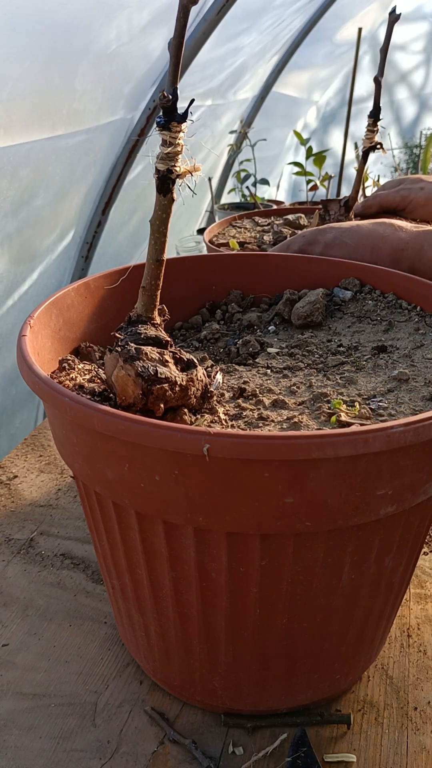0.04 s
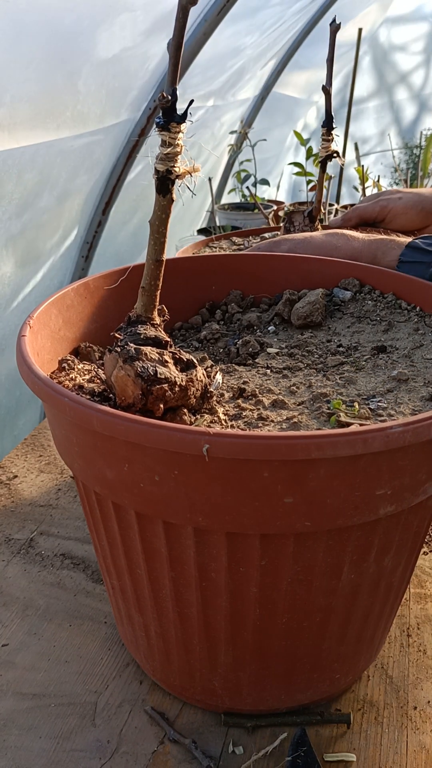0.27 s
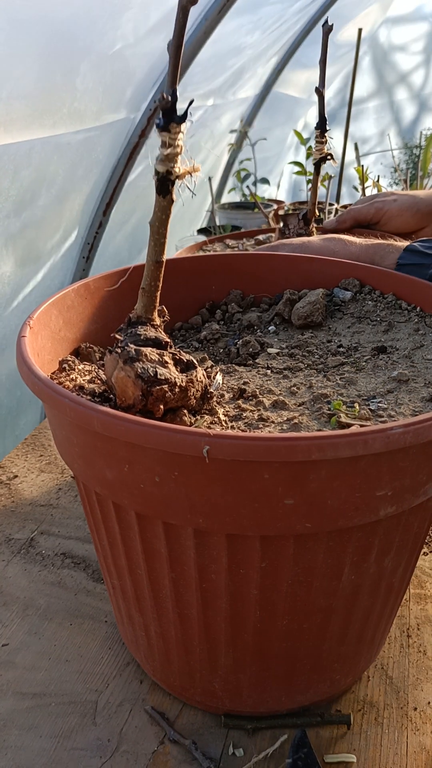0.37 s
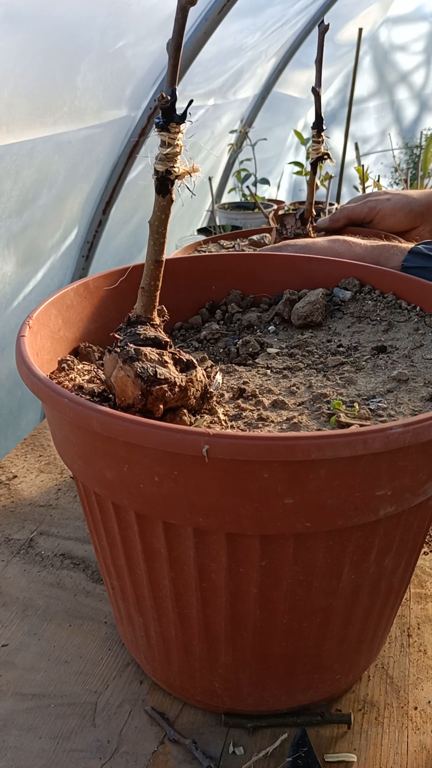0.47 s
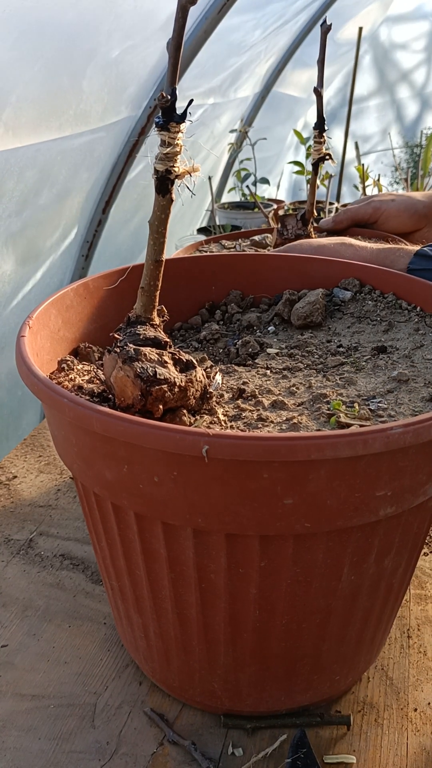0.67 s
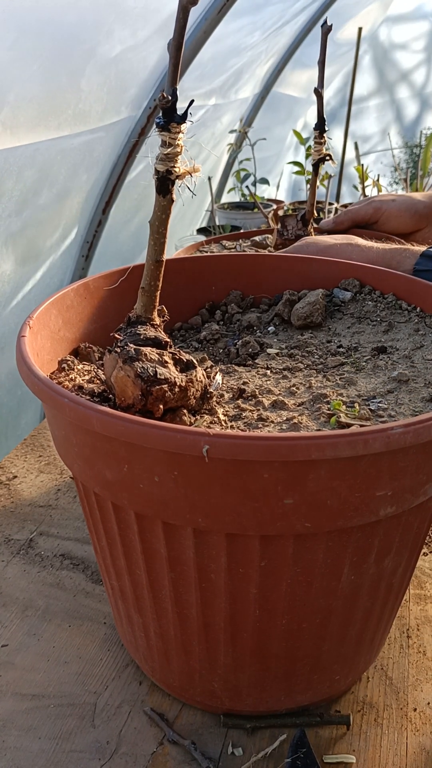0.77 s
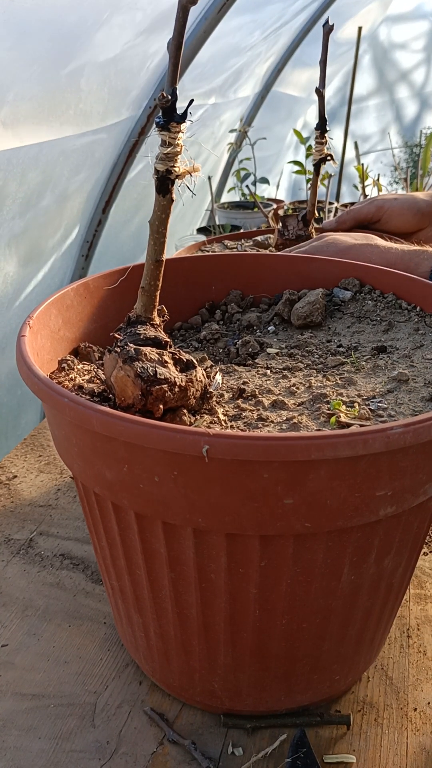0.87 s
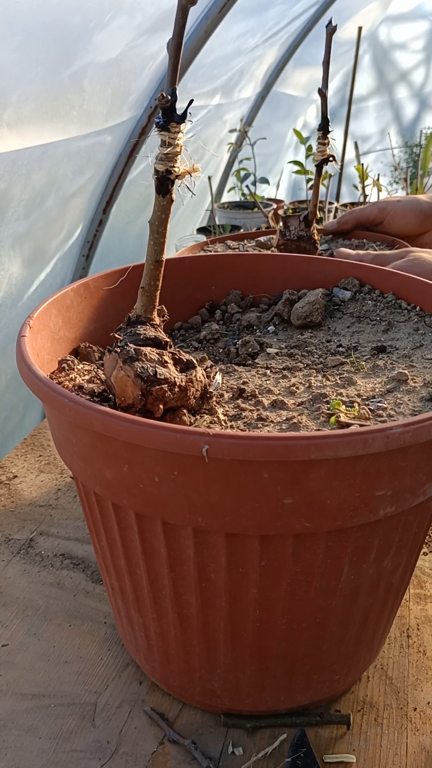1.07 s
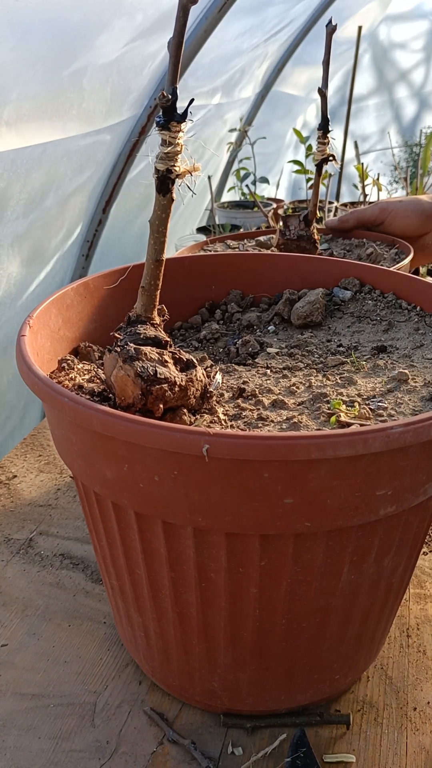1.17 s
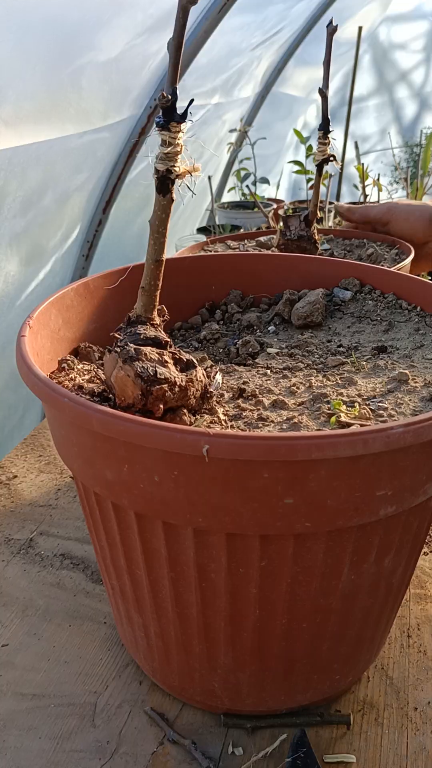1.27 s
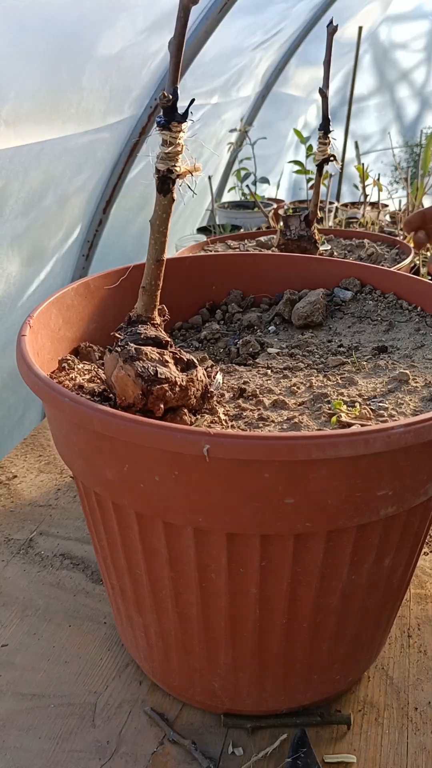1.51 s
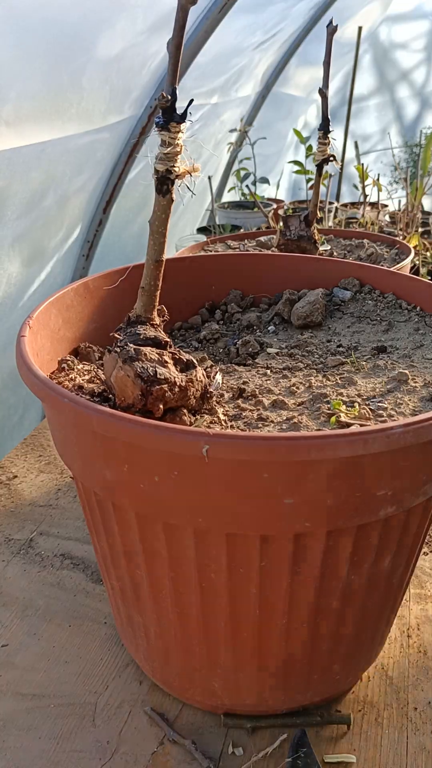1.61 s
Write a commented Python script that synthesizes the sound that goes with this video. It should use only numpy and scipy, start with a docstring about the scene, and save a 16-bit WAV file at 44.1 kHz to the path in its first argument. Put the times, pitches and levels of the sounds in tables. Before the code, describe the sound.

A plastic plant pot scrapes and knocks on a gritty wooden bench, then cloth swishes.

```python
"""Plant pot on a greenhouse bench

A soil-filled plastic pot scuffs over grit, knocks down and drags to rest while the wooden bench thuds
and rumbles under it. A hand rubs the rim, then a sleeve swishes past as the arms draw back. All this
sits on the left; the muffled right microphone gets low buffeting and a few bumps. Quiet air fills both."""
import sys
import numpy as np
from scipy import signal
from scipy.fft import rfft, irfft
from scipy.io import wavfile
from scipy.ndimage import uniform_filter1d

SR = 44100
rng = np.random.default_rng(int(sys.argv[2]) if len(sys.argv) > 2 else 0)


def wav_record(signal):
    """Record a signal, one row per channel, as 16-bit PCM in the file named by sys.argv[1]."""
    frames = np.transpose(np.atleast_2d(signal))
    bounded = np.clip(frames, -1, 1)
    # unit amplitude maps onto the largest positive 16-bit level
    quanta = np.round(bounded * 32767).astype(np.int16)
    wavfile.write(sys.argv[1], SR, quanta)


N = 72765
T = np.arange(N) / SR
HZ = np.fft.rfftfreq(N, 1 / SR)

# Tone of the outdoor air on each side: f/Hz, level/dB
AIR_LEFT_EQ = [(20, 2.5), (60, -6), (120, -4.5), (200, -11), (450, -14.5), (680, -20.5), (860, -16.5),
               (1100, -27), (1600, -25.5), (2150, -27.5), (3000, -30.5), (5000, -37.5), (7400, -44.5),
               (9200, -51), (15500, -46)]
AIR_RIGHT_EQ = [(20, 1.5), (100, -0.5), (160, -6), (400, -9), (1000, -17.5), (3500, -20), (6000, -28.5),
                (9000, -29), (15500, -28)]
# Fader ride on the right-hand air: t/s, level/dB
HISS_RIDE = [(0, -7), (.16, -5.5), (.23, 2), (.62, 1.5), (.78, -1), (.85, -4), (.92, -1), (1.65, -0.5)]
# Air buffeting the right microphone: t/s, sway level/dB, flutter level/dB
BUFFET_RIDE = [(0, -58, -75), (.15, -60.5, -57.5), (.25, -29.5, -46), (.35, -41.5, -56), (.395, -29.5, -36),
               (.45, -18, -18.5), (.51, -21, -38), (.6, -24, -39), (.68, -34.5, -46), (.77, -40, -47.5),
               (.86, -46, -73), (.93, -43, -62), (1.06, -41.5, -54), (1.28, -44.5, -69), (1.38, -52, -92),
               (1.65, -56, -65)]
# Tone of its deep sway and its flutter: f/Hz, level/dB
SWAY_EQ = [(5, -6.5), (14, 11), (28, 11.5), (45, -3.5), (80, -46), (200, -78)]
FLUTTER_EQ = [(20, 0), (60, 4), (90, 7.5), (115, 2.5), (160, -17), (400, -24.5), (800, -42.5), (1400, -53),
              (5000, -85)]
# Bumps on the right microphone and thuds of the bench: t/s, relative level/dB, high cut/Hz
MIC_BUMPS = [(.258, -39.5, 420), (.328, -48, 704), (.431, -30.5, 580), (.448, -11, 116), (.578, -35, 217),
             (.768, -58, 275)]
BENCH_THUDS = [(.266, -33.5, 340), (.497, -29.5, 223), (.565, -39.5, 350), (.699, -37, 200),
               (1.123, -38, 185), (1.324, -42, 334), (1.574, -33.5, 191)]
# Stroke of the sleeve: t/s, rub level/dB, fizz level/dB
SLEEVE_RIDE = [(1.0, -59.5, -83), (1.13, -51, -60), (1.22, -45.5, -57), (1.33, -41.5, -45),
               (1.41, -38.5, -44), (1.5, -37, -52), (1.545, -37, -73), (1.58, -45, -50), (1.65, -45.5, -60)]
# Tone of the cloth's rub and its treble fizz: f/Hz, level/dB
SLEEVE_EQ = [(500, 4.5), (850, -4), (1150, 4), (1350, 4.5), (1500, -2.5), (1800, 1.5), (2700, 0),
             (3500, 3.5), (4700, 1), (6200, 0.5), (7100, 6.5), (8100, 4), (9000, -3), (10500, -10),
             (15500, -14)]
FIZZ_EQ = [(600, -24), (1150, 7.5), (3000, 2.5), (6000, -11), (8000, 4), (9500, 1.5), (11500, -1),
           (15500, -6)]
# Swells of the hand on the rim, the base on grit and the rumbling bench: t/s, level/dB
RIM_RIDE = [(.84, -75), (.92, -58), (.965, -53), (.995, -48), (1.025, -56.5), (1.08, -85)]
GRIT_RIDE = [(0, -44.5), (.14, -51.5), (.2, -45), (.28, -47.5), (.32, -55.5), (.385, -49), (.405, -42),
             (.5, -43), (.56, -50), (.7, -53), (.8, -55.5), (.86, -64), (.94, -51), (1, -52), (1.05, -57.5),
             (1.15, -56.5), (1.65, -50)]
RUMBLE_RIDE = [(0, -46), (.15, -53), (.2, -49.5), (.27, -37), (.32, -70), (.38, -60), (.41, -30.5),
               (.5, -42.5), (.6, -35), (.68, -49), (.85, -43), (1, -69), (1.65, -55)]
# Tone of the same three: f/Hz, level/dB
RIM_EQ = [(900, -23), (1850, -13), (2230, -0.5), (2600, -10.5), (3600, -12), (4800, -22), (7400, -19),
          (9500, -25), (15000, -36)]
GRIT_EQ = [(200, 10.5), (700, 4), (1200, 1.5), (1500, -1.5), (1800, -1.5), (2400, 0), (3600, 0), (4800, -5),
           (6200, -5.5), (7300, -3), (8200, -6), (9200, -10.5), (11000, -17.5), (15500, -23)]
RUMBLE_EQ = [(20, 11.5), (70, 10), (130, -2.5), (250, -5.5), (420, -6), (600, -11.5), (900, -17),
             (1500, -66), (4000, -65)]
# Modes of the soil-filled pot: f/Hz, relative level/dB, T60/s
POT_MODES = [(274, -8, 0.05), (420, -6, 0.023), (770, -23, 0.017), (936, -9.5, 0.051), (1226, -13.5, 0.075),
             (1743, -15, 0.023), (2044, -7.5, 0.019), (2620, -22, 0.023), (3068, -17, 0.032),
             (3950, -13.5, 0.024), (5840, -8.5, 0.018), (7375, -8, 0.017)]
# Knocks and taps of the pot: t/s, relative level/dB, high cut/Hz, low cut/Hz, relative snap level/dB
POT_KNOCKS = [(0.1527, -21, 3320, 2970, -60), (0.1852, -29, 4960, 500, -53), (.252, -32.5, 6000, 895, -52),
              (.3888, -15, 10100, 180, -28.5), (0.3934, -22, 3220, 350, -41), (.432, -22, 1310, 500, -60),
              (0.6146, -25, 2700, 1400, -38), (1.361, -17.5, 1400, 1410, -68),
              (1.508, -24.5, 1930, 1210, -61), (1.564, -14, 1350, 1420, -52), (1.599, -24, 5500, 1110, -43)]

GRAINY_SLIPS = dict(per_s=2500, spread_db=3, share=0.53)
FIBRE_SLIPS = dict(per_s=7000, spread_db=1.5, share=0.34)


def amp(db):
    """Decibels to gain."""
    return 10 ** (np.asarray(db) / 20)


def unit(x):
    """Scales to rms 1."""
    return x / np.sqrt(np.mean(x ** 2) + 1e-20)


def ride(points, column=1):
    """A fader move: gain over time from one dB column."""
    columns = np.transpose(points)
    return amp(np.interp(T, columns[0], columns[column]))


def colour(x, eq):
    """Shapes a sound with an EQ curve, at rms 1."""
    hz, db = np.transpose(eq)
    gain = amp(np.interp(np.log(HZ + 1), np.log(hz + 1), db)) * (HZ > 0)
    return unit(irfft(rfft(x) * gain, N))


def band(x, hz, kind, order=2):
    """Low-pass or high-pass."""
    return signal.sosfilt(signal.butter(order, hz, kind, fs=SR, output="sos"), x)


def add(mix, start_s, sound):
    """Drops a sound into the mix on its cue."""
    part = mix[round(start_s * SR):][:len(sound)]
    part += sound[:len(part)]


def noise(eq):
    """A bed of coloured noise."""
    return colour(rng.standard_normal(N), eq)


def steady(x):
    """Evens out the chance swells of a low noise."""
    power = uniform_filter1d(abs(signal.hilbert(x)) ** 2, size=1500)
    return unit(x / np.sqrt(power + 1e-9))


def friction(per_s, spread_db, share, patch_db=1.63):
    """Tiny uneven slips carry a share of the power over a smooth rub; the tone drifts in patches."""
    slips = (rng.random(N) < per_s / SR) * rng.choice([-1, 1], N)
    sizes = amp(spread_db * np.minimum(rng.exponential(1, N), 4))
    rub = np.sqrt(share) * unit(slips * sizes) + np.sqrt(1 - share) * rng.standard_normal(N)
    spectra = signal.stft(rub, nperseg=256)[2]
    patches = uniform_filter1d(rng.standard_normal(spectra.shape), size=5, axis=0)
    patches = unit(uniform_filter1d(patches, size=12, axis=1))
    return signal.istft(spectra * amp(patch_db * patches))[1][:N]


def air(eq, db):
    """Outdoor air lays a quiet bed of hiss."""
    return amp(db) * noise(eq)


def greenhouse(x, tail_db=-13, t60=0.28, echo_db=-14):
    """Adds eight early reflections from bench and pots, and a short soft tail."""
    t = T[:SR // 3]
    tail = rng.standard_normal(len(t)) * amp(-60 * t / t60)
    echoes = np.zeros(len(t))
    for delay_s, sign in zip(rng.uniform(0.0009, 0.0099, 8), rng.choice([-1, 1], size=8)):
        add(echoes, delay_s, np.array([sign]))
    room = amp(tail_db) * tail / np.linalg.norm(tail) + amp(echo_db) * echoes / np.linalg.norm(echoes)
    return (x + signal.fftconvolve(x, room)[:N]) / np.sqrt(1 + np.sum(room ** 2))


def buffet():
    """Moving air sways and flutters at the right microphone."""
    sway = ride(BUFFET_RIDE) * steady(noise(SWAY_EQ))
    flutter = ride(BUFFET_RIDE, column=2) * steady(noise(FLUTTER_EQ))
    return sway + flutter


def thuds(cues, t60, rise_s=0.0034):
    """Soft pushes on bench or microphone: dull, pitchless and quick to die."""
    out, t = np.zeros(N), T[:SR // 5]
    for start_s, db, top_hz in cues:
        lows = band(rng.standard_normal(len(t)), top_hz, "low", order=4)
        body = steady(band(lows, top_hz / 2, "high"))
        envelope = 2 * amp(db - 60 * t / t60) * np.minimum(t / rise_s, 1)
        add(out, start_s, band(envelope * body, top_hz, "low"))
    return out


def sleeve(low_cut_hz=690):
    """Cloth slides over the rim: dense fibre slips that fizz most in mid-stroke."""
    rub = colour(friction(**FIBRE_SLIPS), SLEEVE_EQ)
    rub = unit(band(rub, low_cut_hz, "high"))
    fizz = colour(friction(**FIBRE_SLIPS), FIZZ_EQ)
    return ride(SLEEVE_RIDE) * rub + ride(SLEEVE_RIDE, column=2) * fizz


def rim_rub():
    """A hand slips along the hollow rim."""
    return ride(RIM_RIDE) * colour(friction(**GRAINY_SLIPS), RIM_EQ)


def squeak(start_s=0.525, length_s=0.13, from_hz=6300, to_hz=6000, width_hz=210, db=-60):
    """Rubbed plastic sings faintly in one narrow, falling resonance."""
    progress = np.clip((T - start_s) / length_s, 0, 1)
    pitch_hz = from_hz + (to_hz - from_hz) * progress
    carrier = np.exp(2j * np.pi * np.cumsum(pitch_hz) / SR)
    fuzz = band(rng.standard_normal(N) + 1j * rng.standard_normal(N), width_hz / 2, "low")
    return amp(db) * np.sin(np.pi * progress) * unit((fuzz * carrier).real)


def scrape():
    """Grit slips under the pot's base, and the bench rumbles with it."""
    grit = colour(friction(**GRAINY_SLIPS), GRIT_EQ)
    rumble = steady(noise(RUMBLE_EQ))
    return ride(GRIT_RIDE) * grit + ride(RUMBLE_RIDE) * rumble


def knocks(rise_s=0.00018, crack_db=-2.52, crack_t60=0.02, snap_t60=0.0082, snap_low_cut_hz=3530):
    """Each blow gives a bright snap, a gritty crack and a brief ring of the damped pot."""
    out, t = np.zeros(N), T[:SR // 5]
    attack = np.minimum(t / rise_s, 1)
    ring = sum(amp(db - 60 * t / t60) * (-1) ** k * np.sin(2 * np.pi * hz * t)
               for k, (hz, db, t60) in enumerate(POT_MODES))
    for start_s, db, high_cut_hz, low_cut_hz, snap_db in POT_KNOCKS:
        crack = amp(crack_db - 60 * t / crack_t60) * noise(GRIT_EQ)[:len(t)]
        body = band((ring + crack) * attack, high_cut_hz, "low", order=3)
        body = band(body, low_cut_hz, "high")
        burst = rng.standard_normal(len(t)) * attack * amp(snap_db - 60 * t / snap_t60)
        snap = band(burst, snap_low_cut_hz, "high")
        add(out, start_s, 0.5 * (amp(db) * body + snap))
    return out


def scene():
    """Handling on the left, buffeting and bumps on the right, quiet air in both."""
    handling = greenhouse(knocks() + scrape() + squeak() + rim_rub() + sleeve())
    left = handling + thuds(BENCH_THUDS, t60=0.054) + air(AIR_LEFT_EQ, db=-47)
    right = buffet() + thuds(MIC_BUMPS, t60=0.038) + ride(HISS_RIDE) * air(AIR_RIGHT_EQ, db=-60.5)
    return np.array([left, right])


def record(dry):
    """A steep high cut trims the very top of the mix."""
    high_cut = signal.firwin(511, 15850, window=("kaiser", 9), fs=SR)
    return signal.oaconvolve(dry, high_cut[None], "same")


dry = scene()
out = record(dry)
wav_record(out)
```